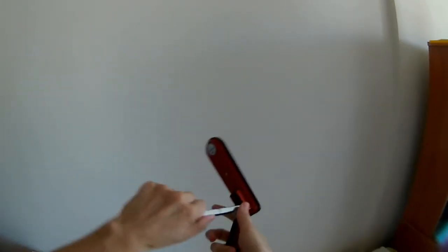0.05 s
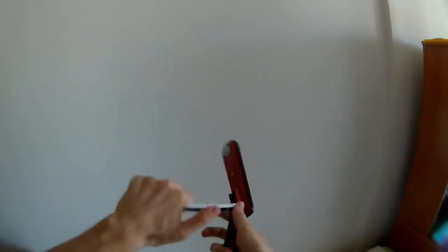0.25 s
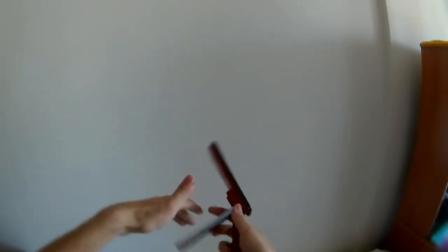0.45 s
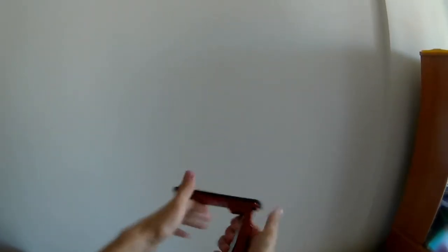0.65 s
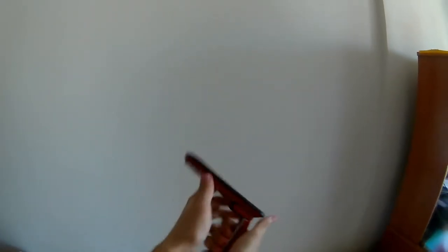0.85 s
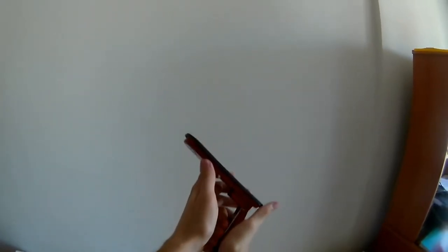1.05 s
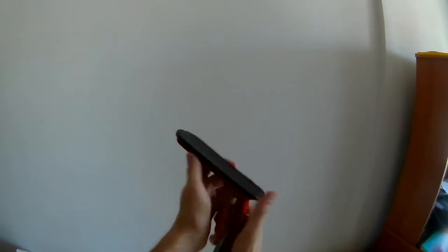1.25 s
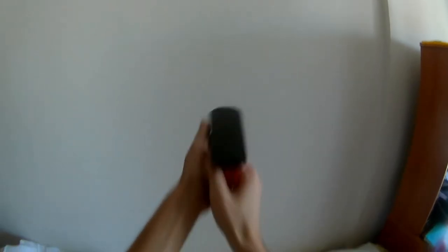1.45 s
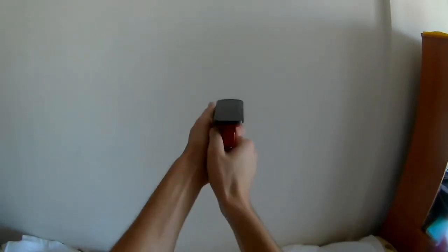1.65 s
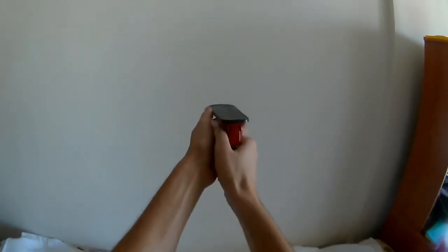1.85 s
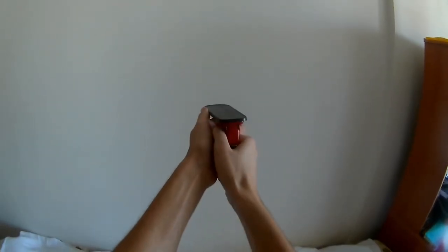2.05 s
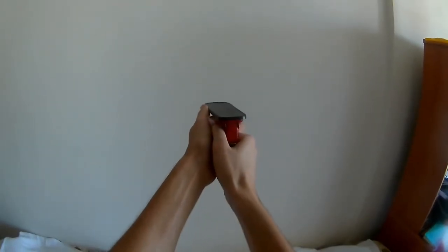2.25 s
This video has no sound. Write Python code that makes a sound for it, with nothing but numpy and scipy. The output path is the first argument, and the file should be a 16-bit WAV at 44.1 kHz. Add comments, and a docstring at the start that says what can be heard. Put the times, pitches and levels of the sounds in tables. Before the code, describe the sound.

A hand-held stapler is loaded and closed. Steel slides faintly at the start and snaps home sharply at about 0.25 seconds, with a slight spring ring. Light plastic and metal rattles and clicks follow from 0.6 to 1 second. Two sharp latching clicks come at 1.1 and 1.2 seconds, with a short room echo. Only soft hiss and low rumble remain until about 2.3 seconds.

```python
"""In a small quiet room, a hand-held stapler is loaded and closed.
Steel slides in the staple channel and snaps home; the arms rattle, swing shut and latch in two clicks.
Each contact rings the steel channel, its spring and the plastic shell, whose pitch rises as the
stapler closes. The room adds a short echo. Behind it all lie a soft steady hiss and a low rumble."""
import sys
import numpy as np
from scipy import signal
from scipy.fft import rfft, irfft
from scipy.io import wavfile

SR = 44100
rng = np.random.default_rng(int(sys.argv[2]) if len(sys.argv) > 2 else 0)


def digitize_waveform(pressure):
    """Quantize a signal to 16-bit integers and store it at the path in sys.argv[1].

    Rows of a 2-D input are taken as channels; values are limited to [-1, 1].
    """
    field = np.atleast_2d(pressure).T
    bounded = np.clip(field, -1, 1)
    quanta = np.round(bounded * 32767).astype(np.int16)
    wavfile.write(sys.argv[1], SR, quanta)


N = 101429
T = np.arange(N) / SR
RING_T = T[:SR // 2]  # each blow gets half a second to ring out

# The moments when parts hit each other. Each row: start in seconds, steel level in dB, steel treble
# tilt in dB per octave, favoured steel pitch in Hz, spring level in dB, shell level in dB,
# shell pitch in Hz, shell fade time in seconds, arm knock level in dB, thud level in dB.
CONTACTS = [ (0.2404, -17, 3.5, 3660, -42, -28, 1230, 0.018, -26, -28),
            (0.2421, -13.5, 2, 3610, -41.5, -27, 2300, 0.014, -37, -24.5),
            (0.2433, -28, 1, 3800, -32, -8, 1255, 0.017, -27, -19),
            (0.2460, -27, 3, 3900, -54, -19, 1060, 0.012, -44, -27),
            (0.2487, -35, -7, 4500, -44, -20.5, 1750, 0.03, -45, -58),
            (0.438, -69.5, -3, 3500, -65, -41, 1190, 0.02, -55, -68.5),
            (0.574, -60, -8, 2190, -70, -42.5, 1370, 0.025, -62, -61),
            (0.6441, -50, -2.5, 4500, -56, -43, 1820, .015, -68, -55),
            (0.6488, -38, -4, 3700, -64, -52, 1260, 0.012, -57, -50),
            (0.6505, -47, -4, 5700, -73, -26.5, 1192, 0.021, -50, -70),
            (0.6607, -58, -12, 3700, -78, -25, 1185, 0.018, -42, -34.5),
            (0.6760, -69, -7.5, 2900, -64, -27, 1150, 0.016, -52, -41.5),
            (0.6932, -54, -10, 3180, -55, -45, 1230, .015, -61, -66),
            (0.6983, -40.5, -14, 3010, -52, -26, 1170, 0.014, -47, -64),
            (0.843, -76.5, -3.5, 3000, -66.5, -29, 1180, 0.02, -47, -39.5),
            (0.8743, -36, 4.5, 3850, -51, -16.5, 1776, 0.0086, -49, -44.5),
            (0.8757, -32.5, -22, 3800, -55, -18.5, 1290, 0.012, -43, -42.5),
            (0.9662, -51.5, -9, 3300, -65, -29.5, 1810, 0.0077, -41, -59),
            (1.0022, -50, -10, 2000, -67, -23.5, 1750, 0.0072, -40, -50),
            (1.067, -69, -3.5, 2080, -73, -32, 1580, 0.009, -55, -69),
            (1.0800, -44, -1, 6900, -56, -19, 1672, 0.018, -47, -57),
            (1.083, -29.5, -5, 4200, -54, -12, 1650, 0.018, -34, -44),
            (1.0857, -27.5, -13, 2980, -50, -6, 1743, 0.011, -37, -33.5),
            (1.0879, -26.5, -4, 2110, -52, -7, 1762, 0.0083, -38, -40),
            (1.2116, -52, -6, 2100, -55, -34.5, 1880, 0.032, -37, -54),
            (1.2292, -29.5, -3, 6400, -46, -13.5, 1956, 0.009, -31, -49),
            (1.2303, -29, 2, 3080, -60, -8.5, 2154, 0.0075, -37.5, -41),
            (1.2365, -31.5, 0, 4600, -67, -44, 2230, 0.017, -46, -71), ]
# The tones of the steel channel, the spring, the hinged arm and the body held in the hand.
# Each row: pitch in Hz, level in dB, fade time in seconds.
CHANNEL_TONES = [(2256, -5, 0.013), (2823, -6.5, 0.013), (3090, -9.5, 0.019), (3519, -5, 0.014),
                 (3900, -7, 0.012), (4532, -12, 0.016), (6160, -10, 0.009), (7200, -15.5, .008),
                 (13950, -17.5, 0.0124)]
SPRING_TONES = [(1287.5, -3.5, .13), (1725, -6, .11), (2014, -4.5, 0.15), (2455, -5, .17),
                (2875, -2.5, 0.17), (3290, -2, 0.15), (3748, -13, 0.12), (4312, -9, 0.13)]
KNOCK_TONES = [(861, -10.5, .018), (976, -2, 0.029), (1095, -1, 0.025), (1183, -5, 0.058),
               (1517, -14, 0.045)]
THUD_TONES = [(170.2, -9, 0.055), (245, -9, 0.058), (450.4, -4, 0.027), (559, -2.5, 0.014),
              (733, -8, 0.011)]
# The plastic shell's tones. Each row: multiple of its pitch, level in dB, multiple of its fade time.
SHELL_TONES = [(0.499, -23, 1.1), (.68, -11.5, 1.0), (.9, -9, 1.1), (1.002, 1.5, 1.0), (1.072, -6, 1.2),
               (1.219, -13.5, 1.0), (1.47, -26, .9)]
# The tone colour of the contact's crack, the spring's coils, the sliding hiss, the room's echo and
# the background hiss. Each row: frequency in Hz, relative level in dB.
CRACK_COLOUR = [(300, -13), (1000, 2), (2000, -1), (2600, -4.5), (3200, 3.5), (4550, 0), (5200, -9),
                (6400, -4.5), (7400, -7.5), (8000, -22), (9100, -13.5), (11000, -19), (14100, -16),
                (16000, -40.5)]
COIL_COLOUR = [(500, -14), (1200, -2), (3200, 3), (4600, -6.5), (7000, -14.5), (12000, -28)]
SLIDE_COLOUR = [(1000, 3.5), (2000, 3.5), (4000, -5.5), (5200, -12), (6200, -2), (8200, -33),
                (10800, -37.5), (11700, -11), (13000, -31)]
ROOM_COLOUR = [(100, -2), (400, 0.5), (1000, -2.5), (2000, 0.5), (2700, 2.5), (3600, -5.5), (4600, 5),
               (7000, -1.5), (10000, -0.5), (15000, -5)]
BACKGROUND_COLOUR = [(15, -31.5), (28, -7.5), (50, -5), (70, -15), (100, -10.5), (190, -19), (310, -18.5),
                     (560, -22.5), (1150, -23), (1800, -32.5), (3260, -40.5), (8000, -50.5), (15500, -50)]
# How the sliding and the rumble swell and sink. Each row: time in seconds, level in dB.
SLIDE_LEVELS = [(0, -46.5), (.02, -47), (.05, -53), (.085, -57), (.11, -79), (.205, -84.5), (.22, -62.5),
                (.238, -41), (.245, -83)]
RUMBLE_LEVELS = [(0, -74), (.3, -59.5), (.62, -50.5), (.85, -67.5), (1.25, -54), (1.4, -59), (1.58, -44),
                 (1.9, -57), (2.15, -50.5), (2.3, -62)]
# Echoes from nearby surfaces. Each row: delay in seconds, level in dB.
NEAR_ECHOES = [(.0072, -21.5), (0.0113, -22.5), (0.0159, -25)]


def clicks():
    """Every contact rings steel, spring and shell, knocks the arm and thuds in the hand."""
    out = np.zeros(N)
    for (start, steel_db, tilt_db, focus_hz, spring_db,
         shell_db, shell_hz, shell_fade_s, knock_db, thud_db) in CONTACTS:
        metal = undb(steel_db) * steel(tilt_db, focus_hz) + undb(spring_db) * spring()
        plastic = undb(shell_db) * shell(shell_hz, shell_fade_s)
        body = undb(knock_db) * ring(KNOCK_TONES) + undb(thud_db) * ring(THUD_TONES)
        add(out, start, rise(seconds=0.00031) * metal + plastic + rise(seconds=0.00085) * body)
    return out


def steel(tilt_db, focus_hz, tilt_from_hz=3730, focus_db=10.5, focus_octaves=0.12):
    """The channel rings and the contact cracks, coloured by how hard and where it is struck."""
    def boost_db(hz):
        tilt = tilt_db * np.log2(max(hz / tilt_from_hz, 1))
        # The spot that is struck favours the tones near one pitch.
        focus = focus_db * np.exp(-0.5 * (np.log2(hz / focus_hz) / focus_octaves) ** 2)
        return tilt + focus

    colour = [(hz, db + boost_db(hz)) for hz, db in CRACK_COLOUR]
    crack = undb(1) * noise(colour, len(RING_T)) * fade(seconds=0.01787)
    tones = [(hz, db + boost_db(hz), fade_s) for hz, db, fade_s in CHANNEL_TONES]
    return ring(tones) + crack


def spring():
    """The spring rings with a few clear tones; its many close ones blur into a rustle."""
    tones = ring(SPRING_TONES)
    rustle = undb(-0.5) * noise(COIL_COLOUR, len(RING_T)) * fade(seconds=0.13)
    return tones + rustle


def shell(hz, fade_s, buzz_db=-9, buzz_octaves=0.24):
    """The loose plastic shell rings and buzzes; the grip and the opening set its pitch and fade."""
    band = [(hz * 2 ** octave, -20 * np.log10(1 + abs(octave / buzz_octaves) ** 3))
            for octave in np.linspace(-4, 4, 65)]
    buzz = undb(buzz_db) * noise(band, len(RING_T)) * fade(1.3 * fade_s)
    tones = ring([(hz * ratio, db, fade_s * length) for ratio, db, length in SHELL_TONES])
    return rise(seconds=0.0007) * (tones + buzz)


def slide(catches_per_s=800):
    """Sliding steel catches in many tiny jolts that ring the same parts, with a thin hiss."""
    catches = (rng.random(N) < catches_per_s / SR) * rng.standard_normal(N)
    metal = steel(tilt_db=-6, focus_hz=3647) + undb(-11.5) * spring()
    plastic = undb(9) * shell(hz=1255, fade_s=0.029)
    scrape = unit(signal.fftconvolve(catches, metal + plastic)[:N])
    hiss = undb(-3.5) * noise(SLIDE_COLOUR, N)
    return (scrape + hiss) * swell(SLIDE_LEVELS)


def ring(tones, detune=0.00558):
    """A struck part gives off fading tones, each slightly out of tune from blow to blow."""
    out = 0
    for k, (hz, db, fade_s) in enumerate(tones):
        pitch = hz * (1 + detune * rng.standard_normal())
        wave = (-1) ** k * np.sin(2 * np.pi * pitch * RING_T)  # every other tone starts downward
        out = out + undb(db) * fade(fade_s) * wave
    return out


def room(sound, split_hz=3500, gap_s=0.004, tail_db=-7.5):
    """The room adds a few near echoes, then a short blurred tail whose treble dies first."""
    wash = coloured(even_noise(), ROOM_COLOUR)
    low = signal.sosfiltfilt(signal.butter(2, split_hz, fs=SR, output="sos"), wash)
    treble = wash - low
    tail = (low * fade(seconds=0.245) + treble * fade(seconds=0.23)) * rise(seconds=0.0011)
    echoes = np.zeros(len(RING_T))
    add(echoes, gap_s, undb(tail_db) * tail / np.linalg.norm(tail))
    for delay, db in NEAR_ECHOES:
        add(echoes, delay, undb([db]))
    return sound + signal.fftconvolve(sound, echoes)[:N]


def even_noise(size=1024, passes=4):
    """Noise spread evenly over time and pitch, so that no tone of the room stands out."""
    x = rng.standard_normal(len(RING_T))
    for _ in range(passes):
        cells = signal.stft(x, nperseg=size)[2]
        levelled = np.exp(1j * np.angle(cells))
        x = signal.istft(levelled, nperseg=size)[1][:len(RING_T)]
    return x


def background(hiss_db=-52, rumble_hz=42, width_hz=12):
    """A soft steady hiss lies over a low rumble that swells and sinks."""
    hz = np.fft.rfftfreq(N, 1 / SR)
    band = 1 / (1 + (2 * (hz - rumble_hz) / width_hz) ** 2)
    rumble = unit(irfft(rfft(rng.standard_normal(N)) * band, N))
    return undb(hiss_db) * noise(BACKGROUND_COLOUR, N) + rumble * swell(RUMBLE_LEVELS)


def undb(db):
    """Turn decibels into a number to multiply by."""
    return 10 ** (np.asarray(db) / 20)


def unit(x):
    """Scale a sound to an average strength (rms) of 1."""
    return x / np.sqrt(np.mean(x ** 2))


def fade(seconds):
    """Die away by 60 dB in this fade time."""
    return np.exp(-np.log(1000) * RING_T / max(seconds, 1e-3))


def rise(seconds):
    """Grow smoothly from silence."""
    return 1 - np.exp(-RING_T / max(seconds, 1e-5))


def swell(levels):
    """Glide from one level to the next."""
    return undb(np.interp(T, *np.array(levels).T))


def add(out, start, sound):
    """Mix a sound in at a start time in seconds."""
    i = max(int(round(start * SR)), 0)
    out[i:i + len(sound)] += sound[:len(out) - i]


def noise(colour, size):
    """Make noise with a given tone colour."""
    return coloured(rng.standard_normal(size), colour)


def coloured(x, colour):
    """Give a sound a tone colour and a strength of 1."""
    hz, db = np.array(colour).T
    frequencies = np.maximum(np.fft.rfftfreq(len(x), 1 / SR), 1)
    gain = undb(np.interp(np.log(frequencies), np.log(hz), db))
    return unit(irfft(rfft(x) * gain, len(x)))


def microphone_port(sound, dip_hz=7830):
    """The microphone's opening takes a narrow dip out of the treble."""
    return signal.lfilter(*signal.iirnotch(dip_hz, Q=18, fs=SR), sound)


def scene():
    """The stapler sounds in the room, over the background, in one channel."""
    stapler = room(clicks() + slide())
    return (microphone_port(stapler) + background())[None]


def record(dry, top_hz=15900):
    """Cut away the highest treble."""
    return signal.sosfilt(signal.ellip(10, 0.2, 70, top_hz, fs=SR, output="sos"), dry)


dry = scene()
out = record(dry)
digitize_waveform(out)
```